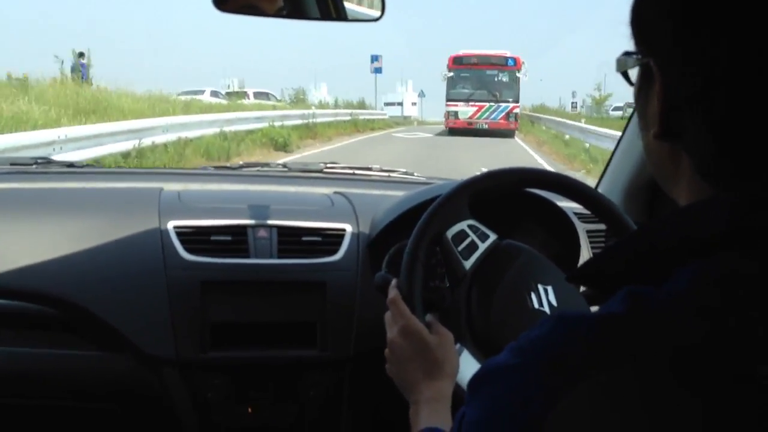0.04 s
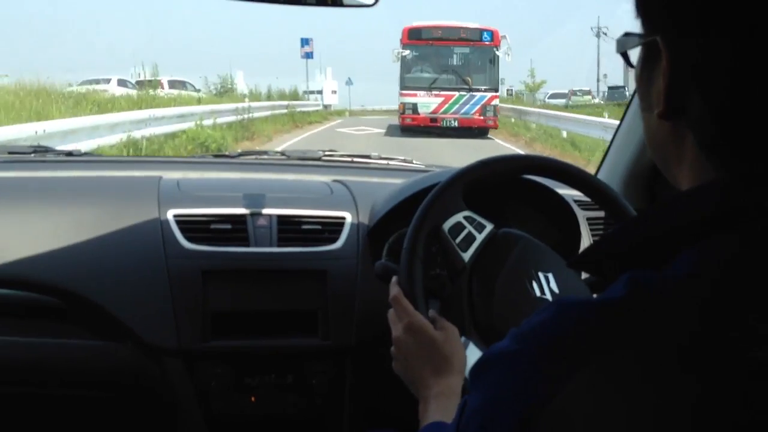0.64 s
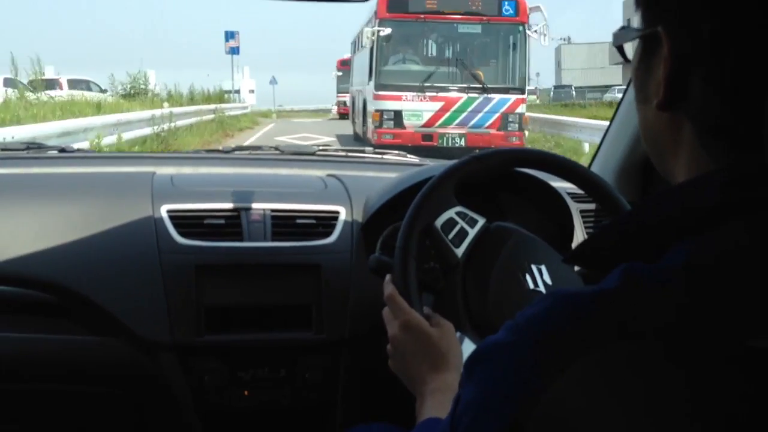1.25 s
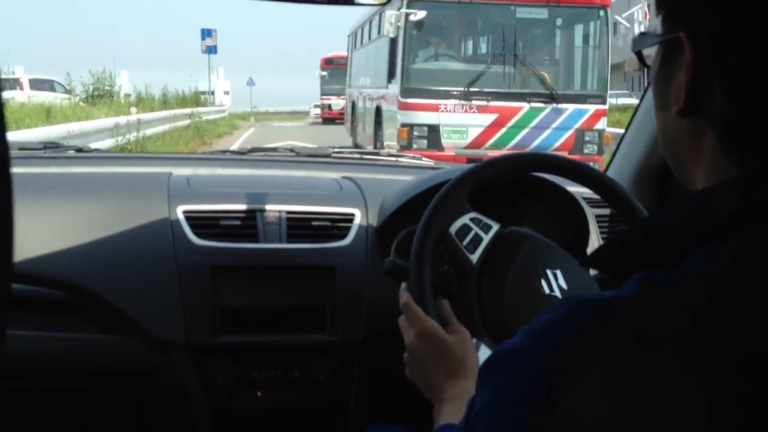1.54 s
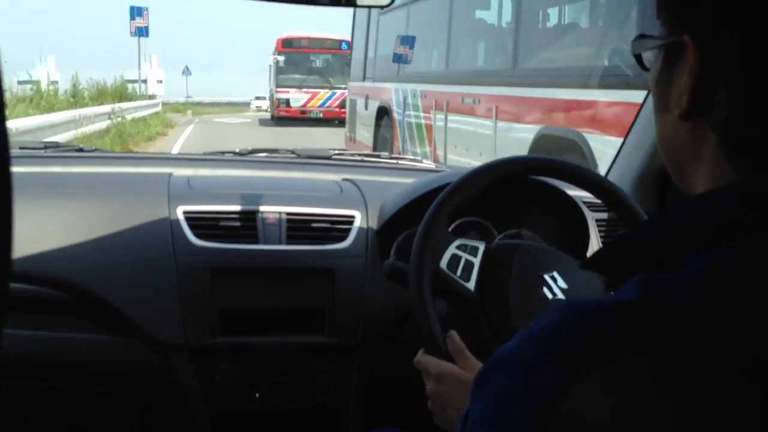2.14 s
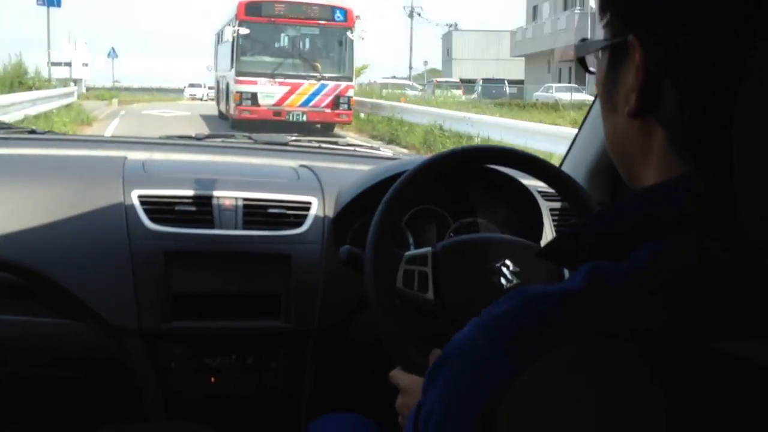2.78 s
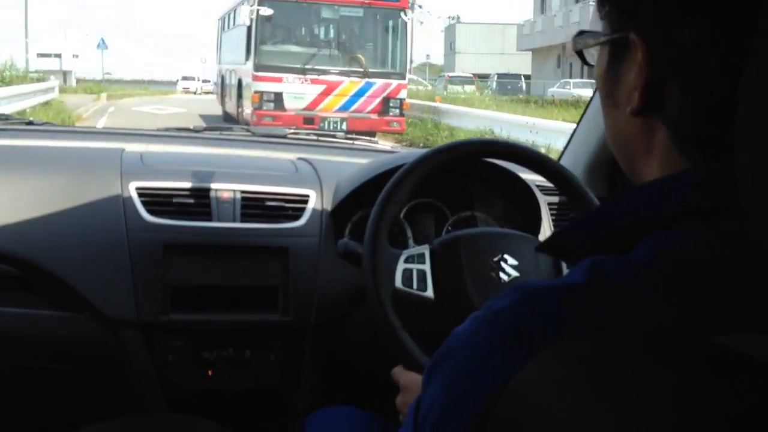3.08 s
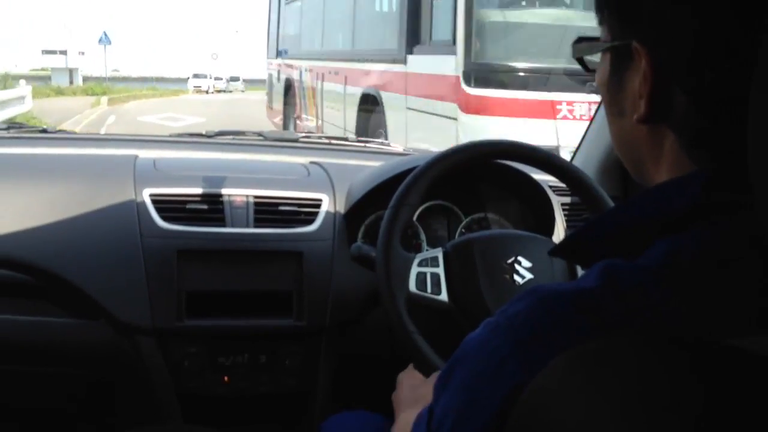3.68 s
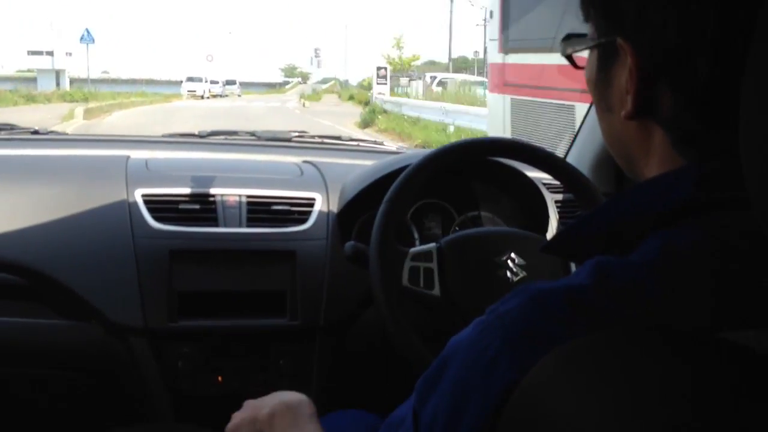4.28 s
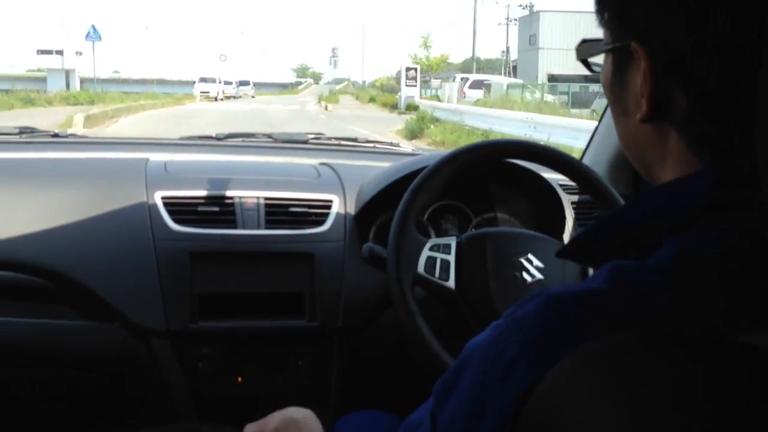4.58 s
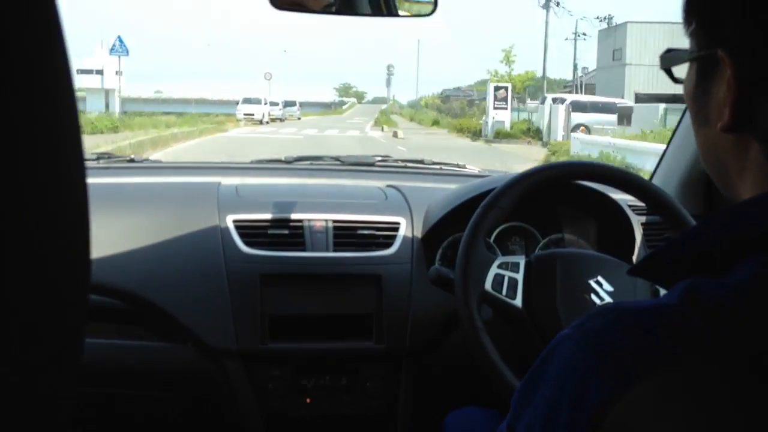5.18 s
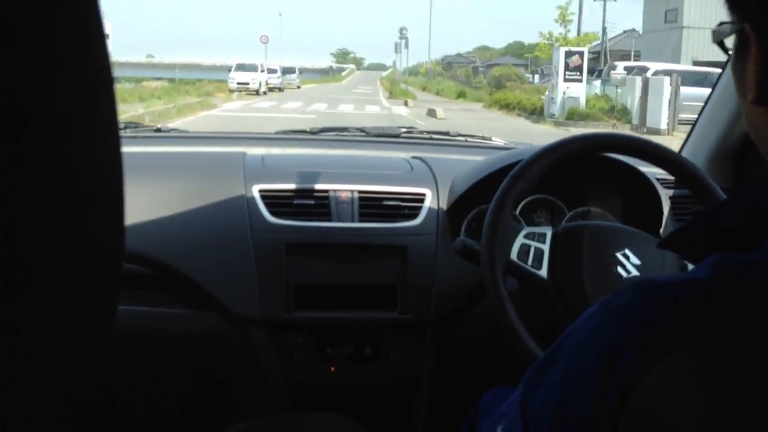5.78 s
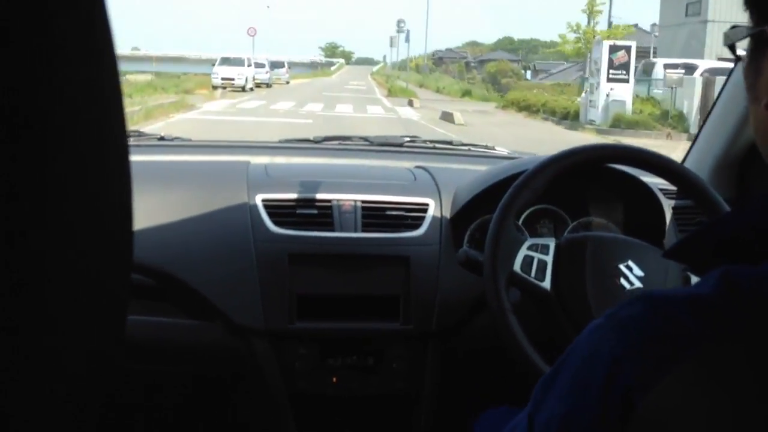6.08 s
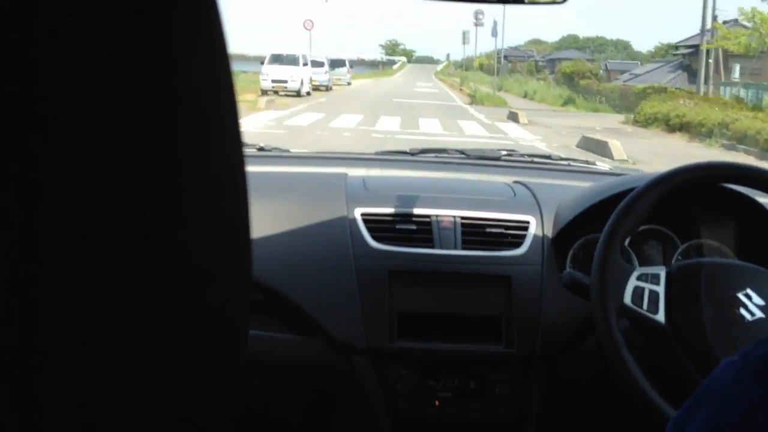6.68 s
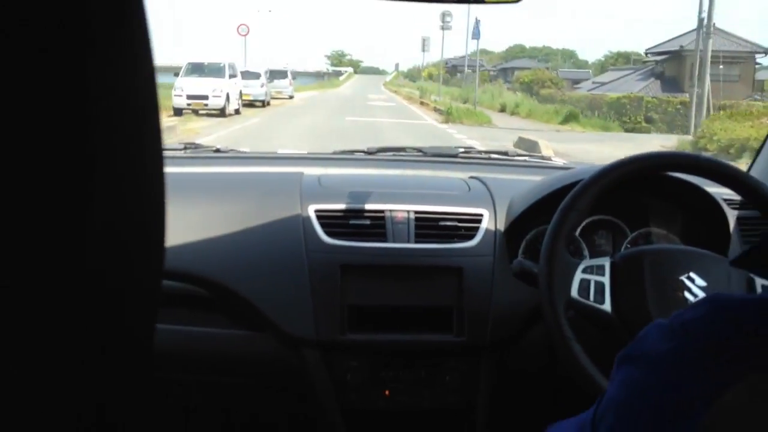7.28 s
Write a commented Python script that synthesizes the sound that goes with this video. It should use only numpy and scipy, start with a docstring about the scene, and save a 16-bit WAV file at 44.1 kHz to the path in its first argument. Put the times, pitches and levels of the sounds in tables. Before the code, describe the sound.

A small car's engine booms and rises over tyre rumble, heard inside the closed cabin, as two muffled buses pass.

```python
"""Inside a small four-cylinder car with the windows shut. From the start the engine's firing makes the
cabin boom, and the tyres rumble through the body. As the engine pulls from 2000 to 3300 rpm, the plastic
trim gives a faint tick or two and two buses pass, muffled by the glass, the first whining as it comes up.
From about 5 s a sleeve brushes the seat. At 6.2 s the throttle closes and the revs sink, and the trim
ticks several times near the end."""
import sys
import numpy as np
from scipy.fft import rfft, irfft, next_fast_len
from scipy.io import wavfile
from scipy.ndimage import uniform_filter1d, map_coordinates

SR = 44100
rng = np.random.default_rng(int(sys.argv[2]) if len(sys.argv) > 2 else 0)


def generate_wav(signal):
    """Clip the signal to [-1, 1] and save it as 16-bit WAV at the path in sys.argv[1]."""
    frames = np.transpose(np.atleast_2d(signal))
    scaled = np.clip(frames, -1, 1) * 32767
    pcm = np.round(scaled).astype(np.int16)
    wavfile.write(sys.argv[1], SR, pcm)


N = 328104


def amp(db):
    """Amplitude ratio of a level in decibels."""
    return 10 ** (np.asarray(db) / 20)


def unit(x):
    """Normalisation to rms 1."""
    return x / np.sqrt(np.mean(x ** 2) + 1e-20)


def curve(rows):
    """Linear interpolation of (time [s], value) rows at every sample."""
    return np.interp(np.arange(N) / SR, *np.transpose(rows))


def wobble(knots_per_s):
    """Smooth random modulation: a spline through Gaussian knots."""
    return map_coordinates(rng.standard_normal(2048), [np.arange(N) * knots_per_s / SR], mode="wrap")


def filtered(x, response):
    """Linear filtering: the spectrum of x times a frequency response."""
    size = next_fast_len(N + SR // 2)
    return irfft(rfft(x, size) * response(np.fft.rfftfreq(size, 1 / SR)), size)[:N]


def colour(x, spectrum):
    """Spectral shaping by (frequency [Hz], gain [dB]) rows, with a steep roll-off above the last."""
    hz, db = np.transpose(spectrum)
    gain = lambda f: amp(np.interp(np.log(f + 1), np.log(hz), db))
    return filtered(x, lambda f: gain(f) / np.maximum(f / hz[-1], 1) ** np.pi)


def noise(spectrum):
    """Coloured noise of rms 1; the spectrum sets only relative levels."""
    return unit(colour(rng.standard_normal(N), spectrum))


def resonant_noise(modes):
    """Random excitation of resonances (frequency [Hz], half-width [Hz], gain [dB]), at rms 1."""
    response = lambda f: sum(amp(db) / (1 + ((f - hz) / width) ** 2) for hz, width, db in modes)
    return unit(filtered(rng.standard_normal(N), response))


def steady(x, span_s):
    """Division by the running rms evens out swells slower than span_s."""
    power = uniform_filter1d(x ** 2, max(int(span_s * SR), 2))
    return unit(x / np.sqrt(np.abs(power) + 1e-9))


def engine(boom_db=-2.5, orders_db=-1.5, roar_db=-6, waver_db=2.83, jitter=0.00064, throb=0.68):
    """Forced vibration: four cylinders fire twice a turn, driving a boom, engine orders and a roar."""
    # engine speed: (time [s], firing rate [Hz])
    firing_rates = [(0.0, 65.77), (0.7, 65.62), (2.15, 69.26), (3.0, 77.33), (4.0, 89.24), (4.55, 95.4),
                    (5.35, 105.1), (5.85, 109.3), (6.2, 109.7), (6.5, 100.2), (6.85, 85.2), (7.1, 74.84),
                    (7.44, 74.03)]
    # how hard the engine pulls: (time [s], level [dB])
    load_levels = [(0, -42.5), (1, -46), (2.15, -44), (2.85, -33.5), (4.8, -32.5), (5.5, -30), (6.2, -36.5),
                   (6.55, -41.5), (7.44, -38.5)]
    # cabin boom, two humps with a null between: (firing rate [Hz], level [dB])
    boom_levels = [(64, -46), (78, -39), (84, -32.5), (90, -28), (95, -26), (100.5, -45), (105, -23.5),
                   (110, -24.5)]
    # engine orders: (frequency [multiples of the crank rate], relative level [dB])
    order_levels = [(3, -8), (4, 4), (4.5, -1), (5, -4), (5.5, -3), (6, 2), (6.5, -1), (7, 1), (7.5, 0),
                    (8, -2), (8.5, -6), (9, -6), (9.5, -6), (10, 2), (10.5, -11), (11, -5), (11.5, -12),
                    (12, 1), (13, -6), (14, -9), (15, -10), (16, -10), (17, -15), (18, -15), (19, -20),
                    (20, -20)]
    # transmission through the bulkhead: (frequency [Hz], gain [dB])
    bulkhead_gains = [(180, -2), (203, 4), (250, -1), (290, 2), (335, 3), (400, 1), (435, -4), (480, 1),
                      (540, 3), (570, -1), (615, 2), (665, 3), (770, -10), (1100, -13)]
    # intake and combustion roar: (frequency [Hz], spectral level [dB])
    roar_spectrum = [(100, -36), (170, 7), (240, -2.5), (300, -9), (355, -4), (400, 7.5), (460, -10),
                     (530, -0.5), (640, -4.5), (760, -12.5), (950, -12), (1400, -27.5), (2500, -35.5),
                     (5000, -58)]
    shut_s, reopened_s, travel_s, overrun_db = 6.18, 7.5, 0.28, -29.5  # the shut throttle adds boom
    t = np.arange(N) / SR
    firing_hz = curve(firing_rates)
    crank = 2 * np.pi * np.cumsum(firing_hz / 2 * (1 + jitter * wobble(13))) / SR
    shut = np.clip(np.minimum(t - shut_s, reopened_s - t) / travel_s, 0, 1)
    boom_gain = amp(np.interp(firing_hz, *np.transpose(boom_levels))) + amp(overrun_db) * shut
    firing_tone = np.sqrt(2) * np.sin(2 * crank + 0.1 * wobble(25))
    boom = firing_tone * boom_gain * amp(boom_db + 0.82 * wobble(20))
    # unequal cylinders give half orders; each order wavers at random, as if crossing the cabin's modes
    orders = np.zeros(N)
    for order, db in order_levels:
        gain = amp(db + waver_db * wobble(5.5))
        orders += gain * np.sin(order * crank + rng.uniform(0, 2 * np.pi) + 0.17 * wobble(23))
    revs_db = 2 * np.log2(firing_hz / firing_hz.mean())  # 2 dB per octave of engine speed
    orders = steady(colour(orders, bulkhead_gains), span_s=0.36) * amp(orders_db + revs_db)
    roar = unit(noise(roar_spectrum) * (1 + throb * np.cos(2 * crank)))
    return boom + amp(curve(load_levels)) * (orders + amp(roar_db) * roar)


def road(shake_db=-37, drone_db=-28.5, tread_db=2, ring_db=-36.0):
    """Structure-borne noise: asphalt excites the body, cabin and tyre cavities, more so with speed."""
    # tread rush, growing with road speed: (time [s], level [dB])
    rush_levels = [(0, -50.5), (3.4, -46), (5, -42), (6.3, -40), (7.44, -43.5)]
    # rough asphalt: (time [s], Gaussian width [s], shake level [dB], drone level [dB])
    rough_patches = [(0.497, 0.16, -35.5, -30), (0.985, 0.12, -46, -28.5), (1.47, 0.053, -35, -29.5),
                     (1.877, 0.04, -30, -29.5), (2.172, 0.15, -35, -31), (2.977, 0.037, -49, -26),
                     (3.77, 0.11, -34, -26.5), (4.08, 0.091, -40, -28.5), (5.322, 0.092, -37, -25.5),
                     (5.57, 0.091, -35, -22.5), (6.3, 0.16, -37, -27), (6.906, 0.074, -26, -37),
                     (7.235, 0.079, -31, -27)]
    # body shake, cabin drone and tread rush: (frequency [Hz], spectral level [dB])
    shake_spectrum = [(8, -38), (20, -16), (28, 3), (33, -0.5), (41, -10), (52, 0), (64, 0), (76, -5),
                      (110, -38)]
    drone_spectrum = [(55, -30), (78, -19.5), (96, -0.5), (108, 0.5), (122, 2), (143, -1), (162, -6),
                      (190, -10), (215, -15.5), (270, -15.5), (350, -22.5), (500, -28.5), (800, -38)]
    tread_spectrum = [(120, -20), (175, 12.5), (220, 13.5), (310, 7.5), (450, 10.5), (620, 2), (790, 0),
                      (950, 2.5), (1250, -2.5), (1500, -6.5), (2000, -14), (2600, -21), (4000, -29),
                      (8000, -38)]
    # tyre cavity and panel resonances: (frequency [Hz], nominal width [Hz], gain [dB])
    panel_modes = [(184, 30, -10), (237.9, 10.4, 5), (311.7, 8.1, -9.5), (383, 5.7, -10), (542, 2.5, -7.5),
                   (627, 8.9, -16), (700, 3.6, -23), (843, 7.3, -21), (943.4, 5.1, -18), (953, 4.9, -25),
                   (1172, 5.2, -23.5), (1227, 7.2, -22), (2073, 6.4, -31.5)]
    t = np.arange(N) / SR
    rush_db = curve(rush_levels)
    pace_db = rush_db - rush_db.mean()
    shake_gain = amp(shake_db + 0.58 * pace_db)
    drone_gain = amp(drone_db + 0.038 * pace_db)
    for centre_s, width_s, patch_shake_db, patch_drone_db in rough_patches:
        swell = np.exp(-((t - centre_s) / width_s) ** 2 / 2)
        shake_gain = np.hypot(shake_gain, amp(patch_shake_db) * swell)  # powers add
        drone_gain = np.hypot(drone_gain, amp(patch_drone_db) * swell)
    shake = shake_gain * steady(noise(shake_spectrum), span_s=0.11)
    drone = drone_gain * steady(noise(drone_spectrum), span_s=0.16)
    rush = amp(rush_db + tread_db + 1.1 * wobble(14)) * noise(tread_spectrum)
    ring = resonant_noise([(hz, 0.78 * width, db) for hz, width, db in panel_modes])
    return shake + drone + rush + amp(ring_db + 0.73 * pace_db) * steady(ring, span_s=0.78)


def trim(ring_db=-7, crack_db=-8, relative_width=0.07, attack_s=0.00016):
    """Impact excitation: loose plastic ticks with a broad crack and a damped band of close modes."""
    # ticks: (time [s], level [dB], ring frequency [Hz], 60 dB decay time [s], crack offset [dB])
    trim_ticks = [(.675, -52, 2780, 0.022, 8), (4.232, -45, 3670, .03, -16), (6.279, -46, 3747, 0.014, 15),
                  (6.913, -48.5, 2891, 0.019, 13), (6.958, -41, 2300, 0.036, -5),
                  (6.999, -49, 2400, 0.026, -7), (7.21, -34, 2180, 0.052, -13),
                  (7.259, -39, 2040, 0.05, -12), (7.277, -44, 2270, 0.13, 0)]
    # (frequency [Hz], spectral level [dB])
    crack_spectrum = [(800, -10), (1600, 4), (5000, -4), (10000, -14), (15000, -12)]
    out, t = np.zeros(N), np.arange(N) / SR
    for start_s, db, hz, t60, offset_db in trim_ticks:
        age = np.maximum(t - start_s, 0)
        envelope = (1 - np.exp(-age / attack_s)) * amp(db - 60 * age / t60)
        ring = amp(ring_db) * resonant_noise([(hz, relative_width * hz, 0)])
        crack = amp(crack_db + offset_db) * noise(crack_spectrum)
        out += envelope * (ring + crack)
    return out


def buses(whine_s=1.63, whine_half_width_s=0.3, whine_db=-51):
    """Distance and transmission loss: each bus swells and fades behind the glass; the first whines."""
    # oncoming buses: (time the rear engine is closest [s], half-width [s], level [dB])
    bus_passes = [(2.576, 0.72, -41.5), (4.6, 0.72, -39)]
    # a bus heard through the glass: (frequency [Hz], spectral level [dB])
    bus_spectrum = [(90, -20), (155, 3), (200, -3.5), (300, 5.5), (480, -11), (700, -11.5), (1100, -21.5),
                    (2200, -29.5), (3200, -39), (4800, -39.5), (7000, -51)]
    # whine of the first bus: (frequency [Hz], half-width [Hz], gain [dB])
    whine_bands = [(652, 14, 1.5), (722, 9.2, 1), (1164, 9, -6)]
    t = np.arange(N) / SR
    swell = lambda peak_s, half_width_s, db: amp(db) / (1 + ((t - peak_s) / half_width_s) ** 2)
    whine = resonant_noise(whine_bands) * swell(whine_s, whine_half_width_s, whine_db)
    rumble = noise(bus_spectrum) * sum(swell(*bus) for bus in bus_passes)
    return whine + rumble


def sleeve():
    """Sliding friction: cloth brushes the seat in soft strokes of high-pitched noise."""
    # strokes: (time [s], duration [s], level [dB])
    sleeve_strokes = [(4.86, 0.23, -66), (5.547, 0.24, -63), (5.68, 0.37, -64), (7.233, 0.077, -67)]
    # rubbing cloth: (frequency [Hz], spectral level [dB])
    cloth_spectrum = [(2000, -23), (4000, -2), (5200, -4), (6400, 0), (8500, -2), (11000, -8), (15000, -13)]
    t = np.arange(N) / SR
    envelope = sum(amp(db) * np.sin(np.pi * np.clip((t - start_s) / duration_s, 0, 1))
                   for start_s, duration_s, db in sleeve_strokes)
    return envelope * noise(cloth_spectrum)


def scene():
    """Superposition of all sources at the back seat, in one channel."""
    return (engine() + road() + trim() + buses() + sleeve())[None]


def record(dry, hiss_db=-62.1, top_hz=15260):
    """Self-noise and band limiting: hiss and faint tones are added, and all above top_hz is cut."""
    # microphone hiss: (frequency [Hz], spectral level [dB])
    hiss_spectrum = [(500, 2), (3000, 1.2), (5000, 0), (7000, -.7), (11500, -1.6), (15200, -2.7)]
    # steady tones of the electronics: (frequency [Hz], level [dB])
    electronic_tones = [(2756, -81.5), (2998, -79.5), (3445, -84.5), (4000, -84), (4134, -85.5),
                        (8000, -88), (9001, -87), (10002, -85), (10998, -90)]
    t = np.arange(N) / SR
    hiss = amp(hiss_db) * noise(hiss_spectrum)
    tones = sum(np.sqrt(2) * amp(db) * np.sin(2 * np.pi * hz * t) for hz, db in electronic_tones)
    return filtered(dry[0] + hiss + tones, lambda f: f < top_hz)[None]


dry = scene()
out = record(dry)
generate_wav(out)
```